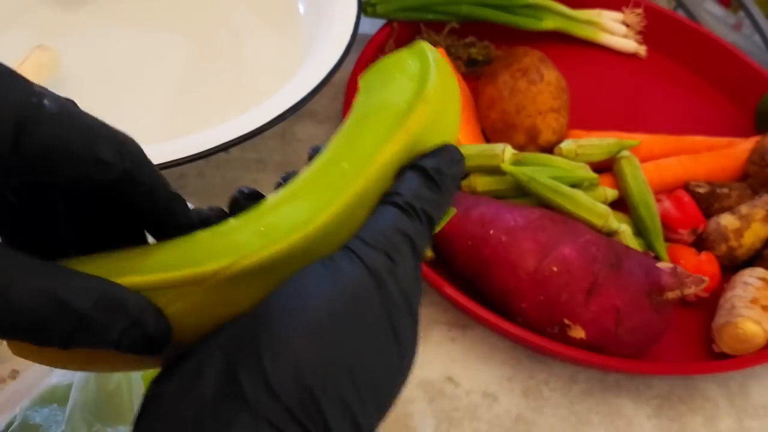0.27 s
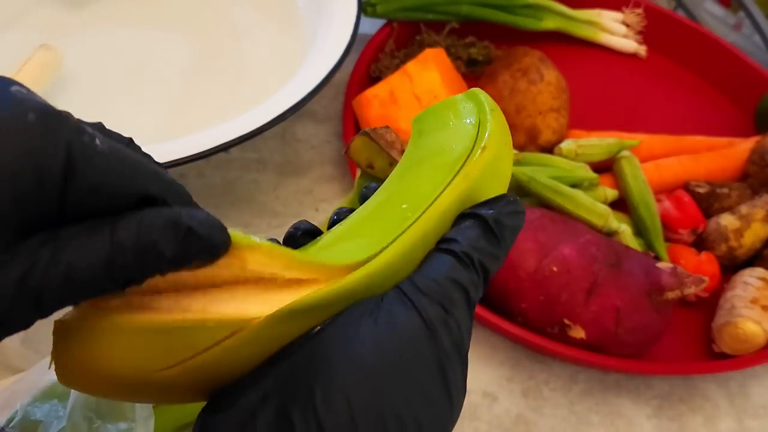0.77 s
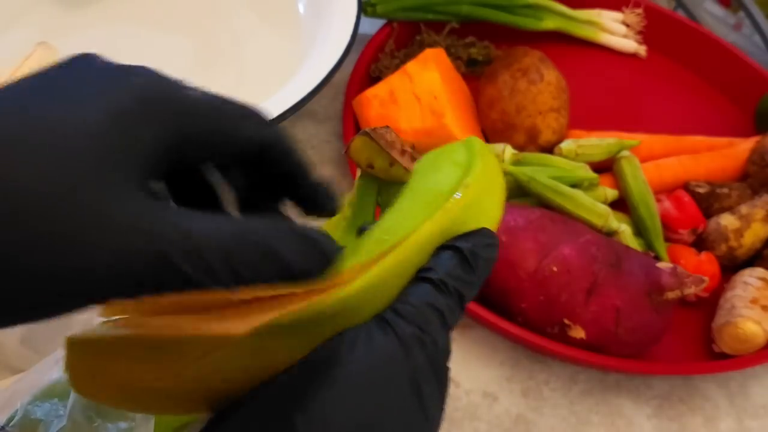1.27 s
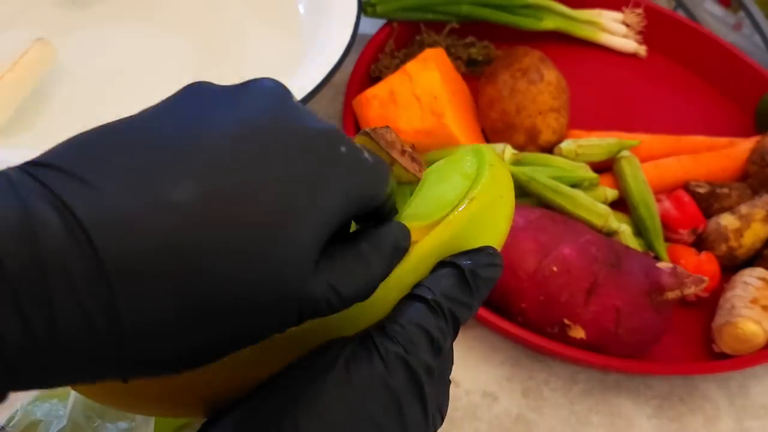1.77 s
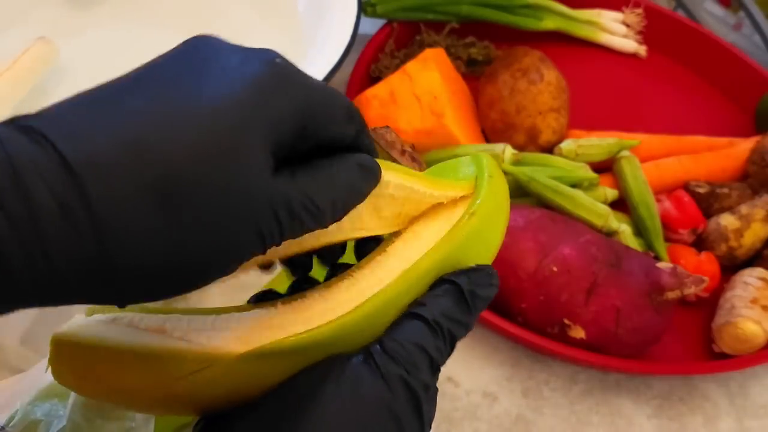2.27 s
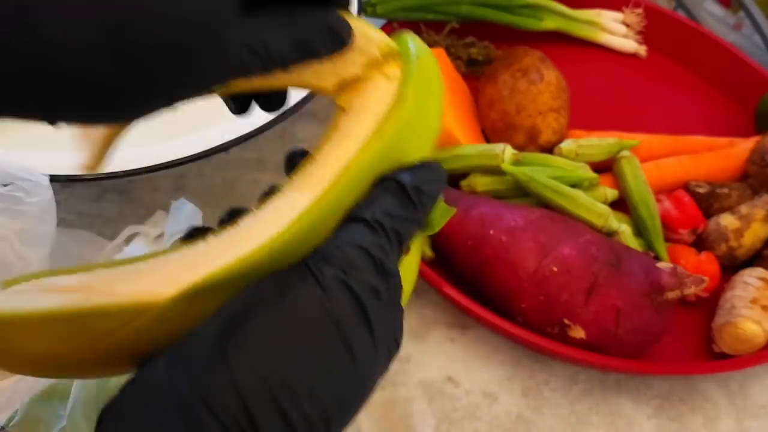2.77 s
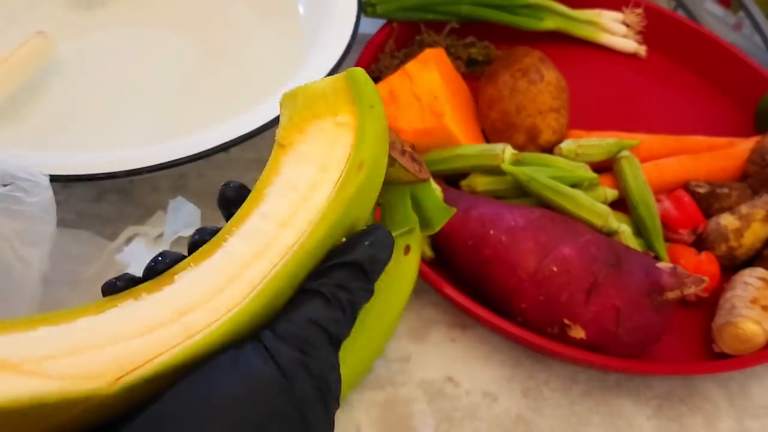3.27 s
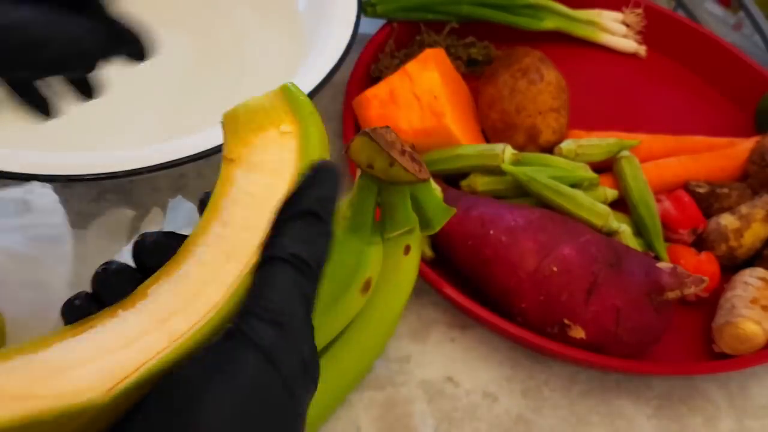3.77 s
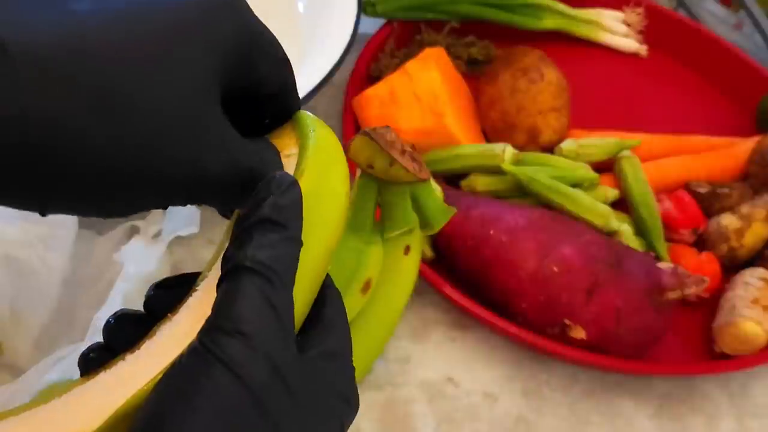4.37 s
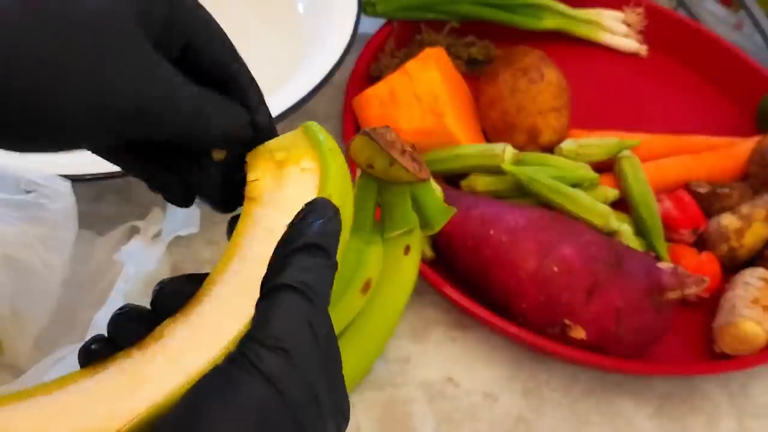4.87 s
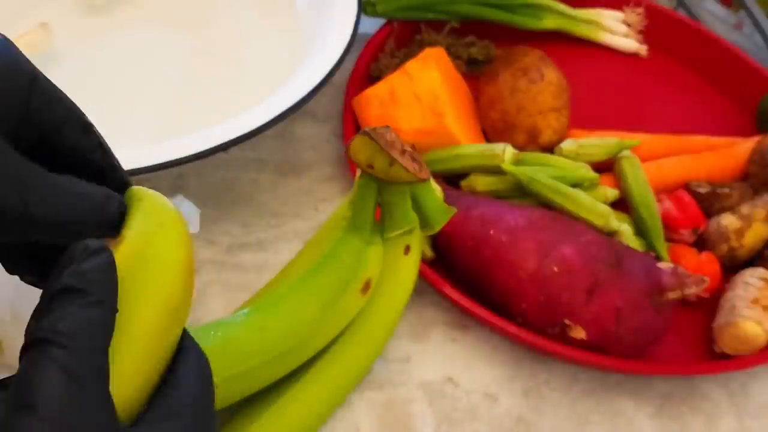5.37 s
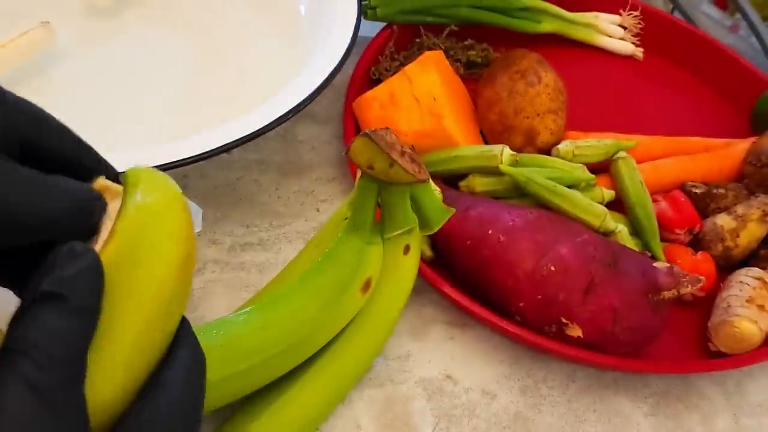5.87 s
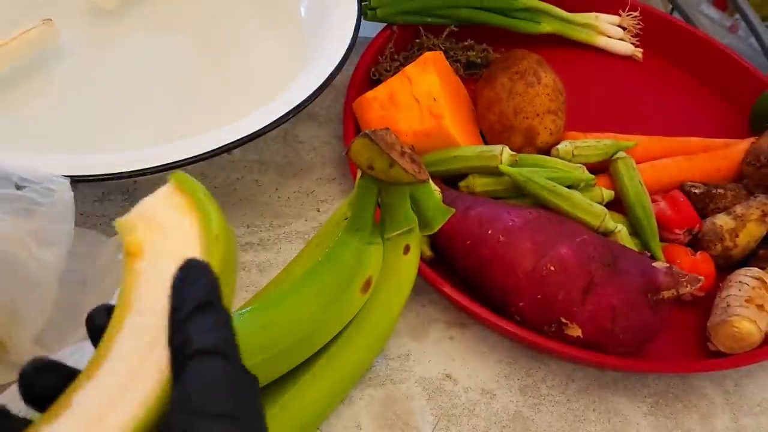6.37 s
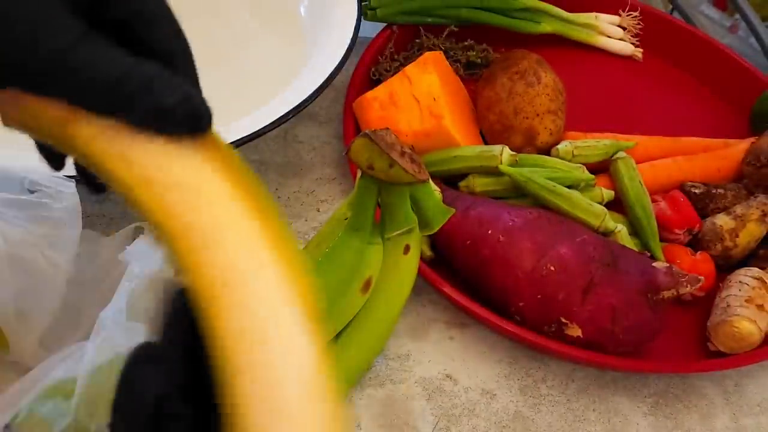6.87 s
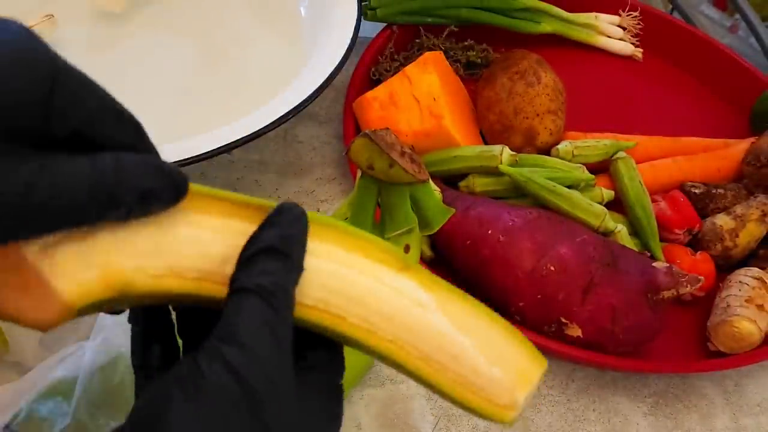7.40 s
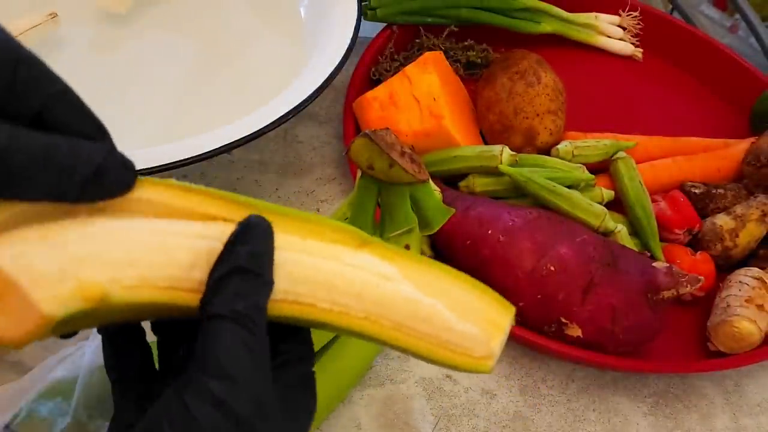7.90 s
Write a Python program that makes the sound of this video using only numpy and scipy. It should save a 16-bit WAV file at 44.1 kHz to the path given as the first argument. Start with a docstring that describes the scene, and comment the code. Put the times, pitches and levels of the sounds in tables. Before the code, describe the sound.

A hard knife knock rings an enamel bowl in a kitchen, then thick green banana peel tears, rubs and snaps over a faint appliance hum.

```python
"""Gloved hands peel a green banana in a hard-walled kitchen, heard by two microphone ports close by.
First a knife is knocked down beside an enamel bowl: a filtered click, room echoes and ringing tones.
Then fibres tear and gloves rub (noise that rises and falls) and the peel snaps (short noise bursts).
Three of the later pulls jolt the counter, which swings at a low pitch and soon dies away.
From start to end an appliance hums and whines faintly: shaped noise and a few slightly unsteady tones."""
import sys
import numpy as np
from scipy import signal
from scipy.fft import rfft, irfft
from scipy.io import wavfile

SR = 44100
rng = np.random.default_rng(int(sys.argv[2]) if len(sys.argv) > 2 else 0)


def dump_mix(stems):
    """Bounce the given channels to the path in sys.argv[1] as a 16-bit WAV at rate SR."""
    frames = np.atleast_2d(stems).T  # one column per channel
    limited = np.clip(frames, -1, 1)  # hard clip at full scale
    pcm = np.round(limited * 32767).astype(np.int16)
    wavfile.write(sys.argv[1], SR, pcm)


N = 358974

# Levels in dB are settings for mixing; later filters, echoes and left-right balance act on them too.
# Steady low noise of the room and appliance, shape only: pitch_hz, level_db (per Hz)
HUM_SHAPE = [(13, -33), (22, -4), (43, -6), (75, -13.5), (107, -1), (193, -8), (261, -4), (327, -10.5),
             (380, -20), (576, -9), (940, -20.5), (1010, -19.5), (1070, -25), (1420, -22.5), (2000, -37.5),
             (2600, -66.5), (4400, -120)]
# Far hiss, shape only: pitch_hz, level_db (per Hz)
FAR_HISS_SHAPE = [(1060, -28), (1800, -5.5), (2210, -6), (2730, -6), (3890, -9), (8310, -10),
                  (10000, -21.5), (15200, -29), (16500, -33)]
HUM_DB, FAR_HISS_DB = -58.5, -71.5
# How alike left and right are in a spread-out sound: pitch_hz, likeness (0 to 1)
LIKENESS = [(60, 1), (180, 0.95), (550, 0.81), (1650, 0.0), (4970, 0.098), (15000, 0)]
# How much louder the hum and far hiss are on the left: pitch_hz, left_over_right_db
HUM_BALANCE = [(60, 0.5), (180, 0.5), (550, 7), (1650, -4.5), (4970, 1.5), (15000, 4)]
# Narrow motor tones: pitch_hz, level_db, width_hz
MOTOR_TONES = [(994, -77.5, 0.2), (1426, -85, 2), (1980, -88.5, 2)]

# How long echoes in the kitchen take to fall by 60 dB: pitch_hz, fade_s
KITCHEN_FADE = [(150, .6), (700, 0.55), (2500, 0.46), (6000, 0.44), (12000, 0.33)]

# Tone colour of the knife knock, shape only: pitch_hz, level_db (per Hz)
KNOCK_COLOUR = [(59, -55), (100, -28.5), (273, -13), (317, -19.5), (811, -11), (922, -5), (3180, -4),
                (7480, -14.5), (9470, -33.5), (15100, -29), (16500, -52.5)]
# Ringing tones of the bowl, fading by 60 dB: pitch_hz, level_db, fade_s
BOWL_TONES = [(226, -40.5, .6), (276.3, -41.5, .5), (602, -49.5, 1.3), (588, -52, 2.5), (756, -36.5, .3),
              (906, -32.5, 0.29), (1028, -36, .4), (1119, -30, 0.34), (1294, -30.5, .45),
              (1414, -44.5, 1.85), (1427, -46.5, 1.1), (1580, -30, .55), (1682, -30.5, .35),
              (1930, -30, .45), (1948, -33, .45), (1977, -43, .55), (1983, -45.5, 1.2), (2006, -36, 0.75),
              (2425, -27, .4), (2505, -33.5, 0.5), (3115, -29.5, 0.39), (3220, -37.5, .4),
              (3340, -33, 0.28), (3670, -35.5, 0.49), (3940, -38, .42), (4520, -34.5, .28),
              (4490, -32.5, 0.32), (5100, -36, .4), (5437, -41, .33)]
KNOCK_S, KNOCK_DB, KNOCK_ROOM_DB = 0.0025, -0.5, 10.5

# Dull jolts through the counter, fading by 60 dB: start_s, level_db, pitch_hz, fade_s
COUNTER_JOLTS = [(3.509, -46, 77, 0.083), (4.607, -40.5, 53.8, 0.13), (5.757, -41.5, 61.6, 0.1)]

# Tone colour of fine, middling and coarse fibres, each: pitch_hz, level_db
FINE_COLOUR = [(2500, -26), (4500, -6), (6000, 2), (11000, 1.5), (16000, 4.5)]
MIDDLING_COLOUR = [(1000, -14), (1800, 3), (2400, 8), (3300, 11.5), (4600, 8), (6200, 1), (12000, -28)]
COARSE_COLOUR = [(120, -3.5), (350, 9), (900, 4.5), (1400, 13.5), (2200, 15.5), (3200, 2), (8000, -28.5)]
FIBRE_COLOURS = (FINE_COLOUR, MIDDLING_COLOUR, COARSE_COLOUR)
# Pulls on the peel and rubs of the gloves: full_at_s, hold_s, rise_s, fall_s, fine_db,
# middling_db (relative to fine), coarse_db (relative to fine)
STROKES = [(.11, 0.088, 0.12, 0.13, -52, -13.5, -17), (0.298, 0.092, .11, 0.23, -62.5, -3, -2),
           (0.539, .03, 0.039, .075, -49.5, -10.5, -22), (0.631, 0.078, .06, 0.14, -52, -9, -15),
           (0.794, .05, .07, .3, -48.5, -15, -21), (.812, 0.013, .01, 0.029, -40.5, -7.5, -10),
           (.982, .002, 0.13, .075, -43.5, -15, -15.5), (1.186, .002, .06, 0.044, -54.5, -8.5, -18),
           (1.13, 0.027, .04, .05, -69.5, 4.5, -3), (1.24, .03, .04, .04, -71, 0.5, -5),
           (1.295, .002, .012, .06, -58.5, -2.5, 0), (1.329, 0.061, .03, .03, -60, -8, -11),
           (1.622, 0.0021, .15, .2, -65, -7.5, -17), (1.694, .002, .02, 0.15, -59.5, -7, -15),
           (1.899, .002, 0.056, 0.043, -44, -10, -7), (1.958, 0.023, .008, .03, -46.5, -7, -4),
           (2.004, .002, 0.078, 0.05, -35.5, -17.5, -19), (2.109, .002, .01, 0.13, -54, -21, -15),
           (2.257, .002, 0.098, 0.037, -57.5, -2, -6), (2.33, .05, .05, 0.08, -66, -4.5, -11),
           (2.487, 0.06, 0.075, .025, -42, -16, -15.5), (2.564, .001, .015, .006, -32, -11, -9.5),
           (2.783, .002, .021, 0.078, -50, -13, -10), (3.006, .016, .008, .03, -46, -8, -8),
           (3.052, 0.00091, 0.041, 0.0088, -28, -11, -14), (3.437, 0.038, 0.035, .05, -61, -9, -3),
           (3.486, .01, .011, 0.2, -40, -5.5, -7.5), (3.586, 0.061, .14, .17, -40, -8.5, -10),
           (3.851, .002, .021, 0.1, -58.5, -23, -9), (4.183, .002, .03, .025, -63.5, -21, -29),
           (4.59, 0.0018, .05, .021, -60, -9, -21), (4.604, .001, .009, 0.019, -29, -6.5, -11),
           (4.644, .25, .05, 0.065, -65.5, -2.5, -19), (5.086, 0.0019, 0.13, .15, -64, -9, -19),
           (5.3, .06, 0.042, .11, -66.5, -7, -16), (5.448, 0.0019, .021, 0.13, -59.5, -4.5, -9),
           (5.58, .002, .04, .14, -65.5, -6, -1), (5.658, .066, .021, .05, -62, -11, -10),
           (5.751, .001, 0.015, 0.02, -31, -9.5, -15), (5.73, .01, .005, .02, -46, -14, -15),
           (5.772, .002, .03, 0.14, -58, -5, -8), (6.124, .05, 0.14, .11, -63, -7, -12),
           (6.21, 0.14, .025, 0.086, -50, -8.5, -8), (6.465, 0.0016, .11, .04, -63, -4, -9),
           (6.507, .002, 0.016, .018, -61.5, 14, -1), (6.595, .002, .012, .06, -55, -3, -11),
           (6.793, .002, 0.44, 0.095, -45.5, -5, -15), (6.858, .03, .04, 0.12, -56, -2, -14),
           (7.098, .002, 0.062, 0.17, -52.5, -3.5, -8.5), (7.322, .09, .02, .11, -58, -14, -13),
           (7.454, 0.068, 0.077, 0.18, -50.5, -10.5, -19), (7.6, 0.51, .11, .11, -56.5, -18, -29),
           (7.72, .002, .05, 0.21, -53, -6, -17), (7.96, .002, .11, .25, -54.5, -7, -11)]
# Faint shifting of the grip, always present: one level_db each for fine, middling, coarse
GRIP_DB = [-85.5, -85, -88]
SWING_DB = 20  # a stroke gains this much in its rise time and loses it in its fall time
GRAIN_DB = 2.1  # how strongly uneven break sizes change the level

# The clearest snaps of peel and glove: start_s, fine_db, middling_db (relative to fine),
# coarse_db (relative to fine)
CLEAR_SNAPS = [(0.214, -44, -32, -40), (0.285, -48, -30, -40), (0.334, -49, -30, -40),
               (0.364, -44, -30, -40), (0.645, -37, -21, -25), (0.812, -38, -18, -26),
               (0.8184, -31, -19, -26), (0.8674, -35, -15, -29), (0.9762, -30.5, -17, -17),
               (1.0114, -32.5, -22, -20.5), (1.5334, -50.5, -13, -23), (1.9574, -32, -13.5, -1),
               (1.9794, -29, -19, -15), (1.9935, -25, -22, -12), (2.0414, -34, -23, -30),
               (2.113, -37, -30, -27), (2.3317, -53, -3, -9), (2.4813, -25, -9, -12.5),
               (2.4954, -31, -17, -25), (2.507, -27.5, -21, -27), (2.5186, -29, -22, -21),
               (2.5273, -27, -23, -20), (2.5631, -15.5, -19.5, -35), (2.5862, -28, -19, -34),
               (2.7672, -42, -9, -6.5), (2.783, -37, -24, -26), (2.8964, -47.5, -18, -27),
               (2.9053, -44, -23.5, -26), (3.0046, -29, -21, -9), (3.015, -38, -23, -25),
               (3.2455, -50.5, -19, -24), (3.7217, -38.5, -13, -28), (3.847, -50, -8, -24),
               (3.8528, -45, -7, -27), (4.455, -53, -8.5, -23), (4.583, -48, -9, -15),
               (4.5981, -25, -13, -16), (4.6004, -20, -10.5, -24), (4.8832, -53, 2, -16),
               (5.357, -43.5, -10, -20), (5.382, -51, -8, -21), (5.447, -35.5, -15, -27),
               (5.468, -41, -12, -25), (5.5843, -44, -7, -10), (5.5974, -50, -13, -18),
               (5.6608, -40, -6, -19), (5.68, -42, -20, -25), (5.7049, -45, -18, -21),
               (5.7306, -34, -24, -28), (5.7383, -29, -19, -8), (5.7483, -20, -23, -25),
               (5.9638, -49.5, -15.5, -7), (6.433, -43, -19, -26), (6.4602, -49, -15, -25),
               (6.5083, -52, 17, -8), (7.0633, -42, -11, -17), (7.207, -44, -21, -20),
               (7.315, -41.5, -5.5, -24), (7.4597, -38, -30, -32.5), (7.5052, -36.5, 0, -21),
               (7.7124, -41.5, -22, -28), (8.0072, -43, -19, -29.5), (8.107, -43.5, -13, -26)]
SNAP_FADE_S = 0.011  # time to fall by 60 dB
SMALL_PER_S = 40  # lesser snaps, at random moments
SMALL_DB, SMALL_SPREAD_DB = 0.2, 3.5  # relative to the fine tearing at that moment; spread of sizes
SMALL_MIDDLING_DB, SMALL_COARSE_DB = -20, -23  # average, relative to the fine part of the snap
FAINTEST_DB = -69.5  # lowest base level, before the spread of sizes

NEARBY_DB, NEARBY_FADE_S = -5, 0.02  # echoes off fingers, fruit and counter; time to fall by 60 dB
HANDS_ROOM_DB, HANDS_PAN_DB, RIGHT_LAG_S = -12, 2.8, 0.00024  # pan: left over right

# Colour added to the hands by the microphone ports: pitch_hz, left_db, right_db
PORT_COLOURS = [(300.2, 2, 1), (1510, 2, 1), (2850, 1, -1), (5645, 2, 2.5), (7410, 5, 6.5), (8670, 4.5, 5),
                (10130, -2.5, -3), (12200, -1.5, -6.5), (15300, 2, -2), (16500, 0.5, -5)]
CUTOFF_HZ = 16050


def from_db(db):
    """Turns decibels into a plain gain."""
    return 10 ** (np.asarray(db) / 20)


def rms_one(x):
    """Scales a sound to an average (rms) strength of 1."""
    return x / np.sqrt(np.mean(x ** 2) + 1e-20)


def at_hz(points, hz, column=1):
    """Reads a table between its points, with pitch spaced by ratio as the ear hears it."""
    points = np.array(points)
    return np.interp(np.log(np.maximum(hz, 1)), np.log(points[:, 0]), points[:, column])


def colour(x, points, column=1):
    """Filters a sound to a dB curve, letting the energy out as early as possible (minimum phase)."""
    size = 8192
    hz = np.arange(size // 2 + 1) * SR / size
    cepstrum = irfft(np.log(from_db(at_hz(points, hz, column))))
    # Folding the second half onto the first makes the filter respond only after its input.
    cepstrum[1:size // 2] *= 2
    taps = irfft(np.exp(rfft(cepstrum[:size // 2 + 1], size)))
    return signal.fftconvolve(x, taps)[:len(x)]


def ring(clicks, hz, fade_s):
    """A click of height 1 starts a fading sine of height 1, as in a struck object."""
    shrink = from_db(-60 / (fade_s * SR))
    turn = 2 * np.pi * hz / SR
    feedback = [1, -2 * shrink * np.cos(turn), shrink * shrink]
    return signal.lfilter([0, np.sin(turn)], feedback, clicks + 1e-18)


def likened(mid, side, hz):
    """Makes left and right of a spread-out sound: long waves reach both ports alike."""
    alike = np.clip(at_hz(LIKENESS, hz), 0, 1)
    return np.sqrt(1 + alike) * mid + np.sqrt(1 - alike) * side * np.array([[1], [-1]])


def steady_noise(spectrum, level_db):
    """Random waves at all pitches, shaped by a curve and leaning left or right by pitch."""
    hz = np.arange(N // 2 + 1) * SR / N
    lean = from_db(at_hz(HUM_BALANCE, hz) / 2)
    mid, side = rfft(rng.standard_normal((2, N)))
    pair = likened(mid, side, hz) * from_db(at_hz(spectrum, hz)) * [lean, 1 / lean]
    return from_db(level_db) * rms_one(irfft(pair, N))


def motor_whine():
    """Each motor tone is a sine whose phase drifts at random, which widens its pitch a little."""
    out = 0
    for tone_hz, level_db, width_hz in MOTOR_TONES:
        wander = np.cumsum(rng.standard_normal(N)) * np.sqrt(2 * np.pi * width_hz / SR)
        phase = 2 * np.pi * tone_hz * np.arange(N) / SR + wander
        tone = likened(np.sin(phase), np.cos(phase), tone_hz)
        out = out + from_db(level_db) * np.sqrt(2) * tone
    return out


def hum():
    """The steady background adds low noise, far hiss and the whine of the appliance."""
    return steady_noise(HUM_SHAPE, HUM_DB) + steady_noise(FAR_HISS_SHAPE, FAR_HISS_DB) + motor_whine()


def kitchen(x):
    """Hard walls return dense echoes: octave bands of noise, each fading at its own rate."""
    t = np.arange(SR) / SR
    tail = 0
    for low_hz in 70 * 2. ** np.arange(8):
        middle_hz = np.sqrt(2) * low_hz
        band = signal.butter(2, [low_hz, 2 * low_hz], "band", fs=SR, output="sos")
        noise = likened(*rng.standard_normal((2, SR)), middle_hz)
        fade = from_db(-60 * t / at_hz(KITCHEN_FADE, middle_hz))
        tail = tail + signal.sosfilt(band, noise) * fade
    tail = tail * np.clip(t / 0.0011, 0, 1)  # echoes build up over about a millisecond
    tail = tail / np.sqrt(np.sum(tail ** 2) / 2)  # average energy of the two sides is 1
    return signal.fftconvolve(x[None], tail, axes=1)[:, :N]


def bowl(click):
    """The click sets the bowl's tones ringing, each with its own strength at each port."""
    out = 0
    for hz, level_db, fade_s in BOWL_TONES:
        sides = likened(1, rng.uniform(-.8, .8), hz)
        out = out + from_db(level_db) * sides * ring(click, hz, fade_s)
    return out


def knock():
    """The knife lands with one hard click, a long wash of echoes and a ringing bowl."""
    click = np.zeros(N)
    click[round(KNOCK_S * SR)] = 1
    crack = colour(click, KNOCK_COLOUR)
    crack = from_db(KNOCK_DB) * crack / np.abs(crack).max()
    direct = np.array([crack, np.roll(crack, round(0.00074 * SR))])  # right hears it later, in s
    room = from_db(KNOCK_ROOM_DB) * kitchen(crack)
    return (direct + room + bowl(click)) * from_db([[-1.3], [1.3]])


def jolts():
    """A push sets the counter swinging at a low pitch; a low-pass filter keeps it dull."""
    out = np.zeros(N)
    for start_s, level_db, hz, fade_s in COUNTER_JOLTS:
        push = np.zeros(N)
        push[round(start_s * SR)] = from_db(level_db + 8)
        out += ring(push, hz, fade_s)
    return signal.sosfilt(signal.butter(2, 250, fs=SR, output="sos"), out)


def effort():
    """Each stroke makes fine, middling and coarse tearing rise, hold and fall; powers add up."""
    t = np.arange(0, N, 20) / SR
    power = from_db(2 * np.c_[GRIP_DB])
    for full_at_s, hold_s, rise_s, fall_s, fine_db, middling_db, coarse_db in STROKES:
        before = np.maximum((full_at_s - t) / max(rise_s, .002), 0)
        after = np.maximum((t - full_at_s - hold_s) / max(fall_s, .002), 0)
        stroke_db = fine_db - SWING_DB * (before + after)
        power = power + from_db(2 * (stroke_db + np.c_[[0, middling_db, coarse_db]]))
    return np.array([np.interp(np.arange(N) / SR, t, np.sqrt(p)) for p in power])


def fibres(gains):
    """Tearing and rubbing is noise in three colours, made grainy by fast, uneven jumps in level."""
    # Each break size holds for 40 samples, about a millisecond.
    sizes = np.minimum(rng.exponential(1, N // 40 + 1), 4)
    grain = rms_one(from_db(GRAIN_DB * np.repeat(sizes, 40)[:N]))
    tearing = 0
    for gain, shape in zip(gains, FIBRE_COLOURS):
        tearing = tearing + gain * rms_one(colour(rng.standard_normal(N), shape))
    return grain * tearing


def small_snaps(fine_gain):
    """Lesser snaps come at random moments, stronger where the tearing is stronger."""
    when, size, middling, coarse = rng.random((SMALL_PER_S * N // SR, 4)).T
    tearing_db = 20 * np.log10(fine_gain[(when * N).astype(int)])
    level_db = np.maximum(tearing_db + SMALL_DB, FAINTEST_DB)
    level_db = level_db - SMALL_SPREAD_DB * np.log(size + 0.028)  # a few come out much louder
    middling_db = SMALL_MIDDLING_DB + 16 * (middling - .5)
    coarse_db = SMALL_COARSE_DB + 16 * (coarse - .5)
    return np.c_[when * N / SR, level_db, middling_db, coarse_db]


def snaps(events):
    """A snap is a few milliseconds of fading noise, with its own share of each fibre colour."""
    length = 3000  # samples
    t = np.arange(length) / SR
    fade = np.clip(t / .0003, 0, 1) * from_db(-60 * t / SNAP_FADE_S)
    kinds = np.zeros((3, N + length))
    noise = rng.standard_normal((len(events), 3, length))
    for (start_s, level_db, middling_db, coarse_db), grains in zip(events, noise):
        burst = fade * grains
        # Every burst gets the same energy before its level is set.
        burst = burst / np.sqrt(np.mean(burst ** 2, axis=1, keepdims=True) / np.mean(fade ** 2))
        shares = from_db(level_db + np.c_[[0, middling_db, coarse_db]])
        start = round(start_s * SR)
        kinds[:, start:start + length] += shares * burst
    return sum(colour(kind, shape)[:N] for kind, shape in zip(kinds, FIBRE_COLOURS))


def nearby(pair):
    """Close surfaces add a few milliseconds of echoes, different at each port."""
    t = np.arange(600) / SR
    echoes = rng.standard_normal((2, len(t))) * from_db(-60 * t / NEARBY_FADE_S)
    echoes = from_db(NEARBY_DB) * echoes / np.sqrt(np.sum(echoes ** 2, axis=1, keepdims=True))
    both = pair + signal.oaconvolve(pair, echoes, axes=1)[:, :N]
    return both / np.sqrt(1 + from_db(2 * NEARBY_DB))  # make up for the added energy


def peeling_hands():
    """Tearing and snaps reach the left port louder and sooner, with echoes and port colour."""
    gains = effort()
    hands = fibres(gains) + snaps(np.vstack([CLEAR_SNAPS, small_snaps(gains[0])]))
    pair = np.array([hands, np.roll(hands, round(RIGHT_LAG_S * SR))])
    pair = pair * from_db([[HANDS_PAN_DB / 2], [-HANDS_PAN_DB / 2]])
    wet = nearby(pair) + from_db(HANDS_ROOM_DB) * kitchen(hands)
    return np.array([colour(wet[0], PORT_COLOURS, column=1), colour(wet[1], PORT_COLOURS, column=2)])


def scene():
    """Adds the background, the knock, the jolts (slightly to the left) and the peeling hands."""
    return hum() + knock() + jolts() * from_db([[1], [-1]]) + peeling_hands()


def record(dry):
    """A steep filter removes the highest treble."""
    return signal.sosfilt(signal.ellip(12, .5, 60, CUTOFF_HZ, fs=SR, output="sos"), dry)


dry = scene()
out = record(dry)
dump_mix(out)
```